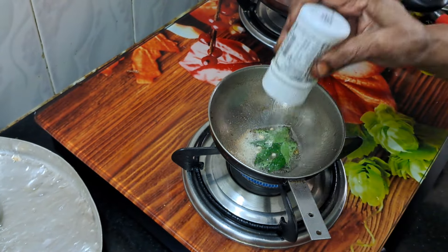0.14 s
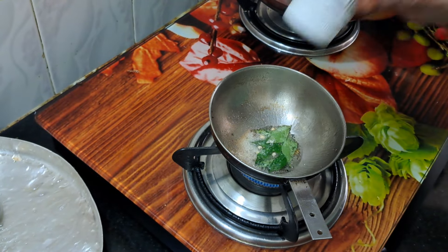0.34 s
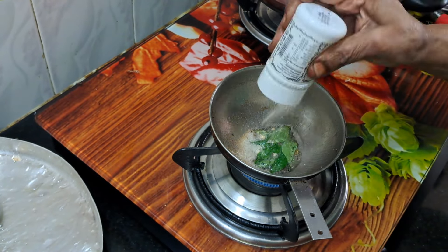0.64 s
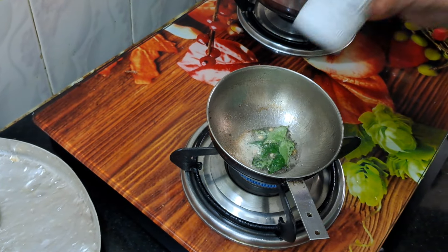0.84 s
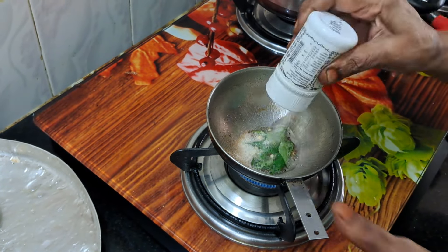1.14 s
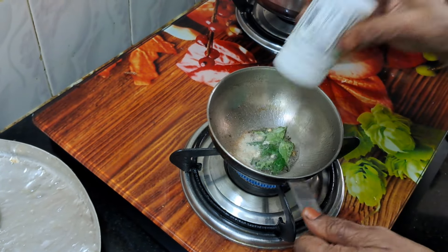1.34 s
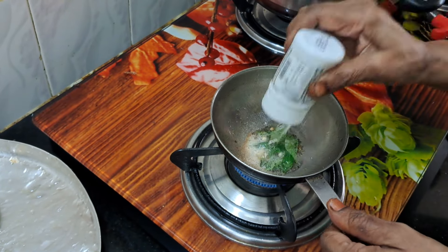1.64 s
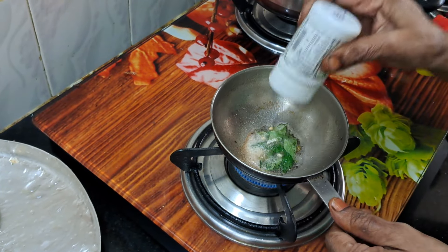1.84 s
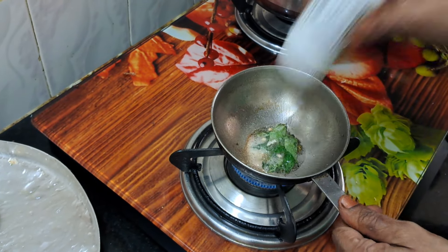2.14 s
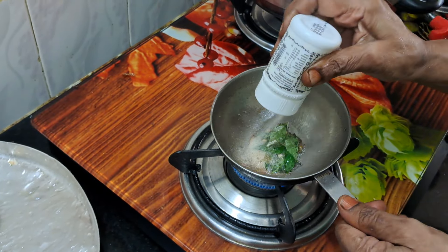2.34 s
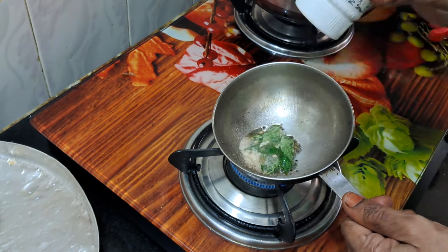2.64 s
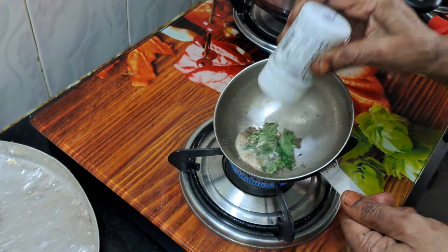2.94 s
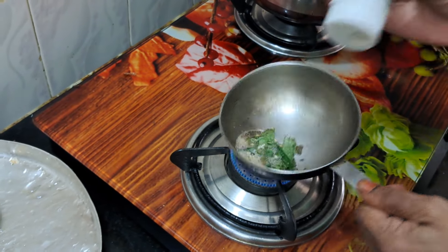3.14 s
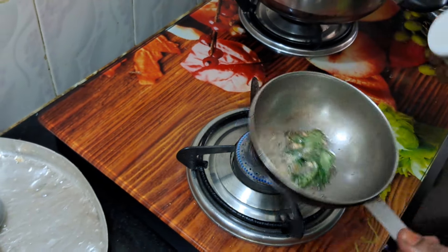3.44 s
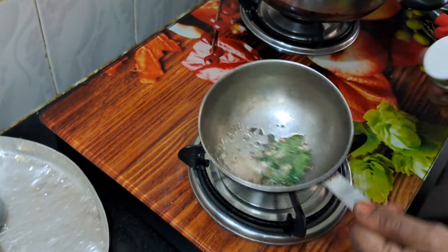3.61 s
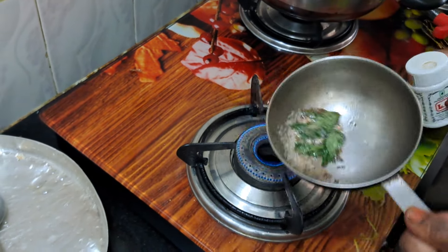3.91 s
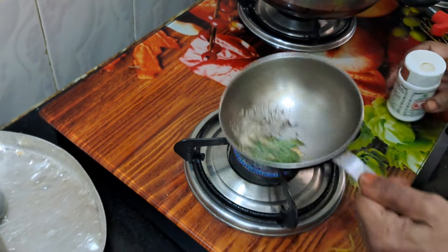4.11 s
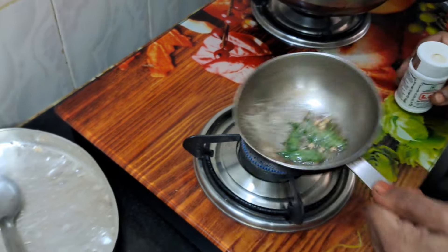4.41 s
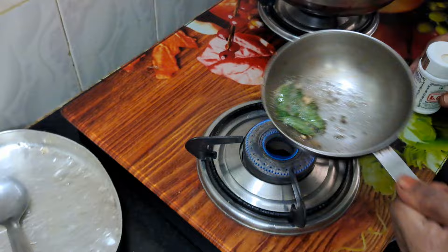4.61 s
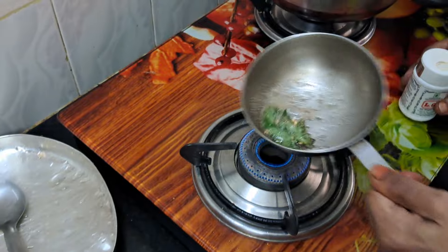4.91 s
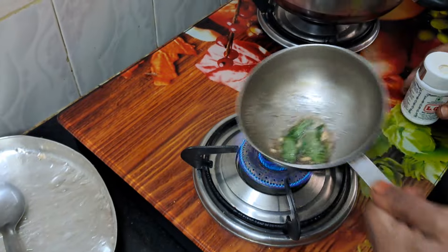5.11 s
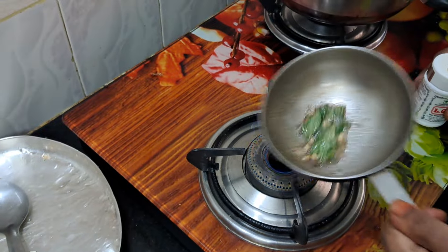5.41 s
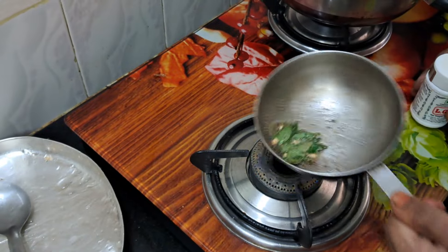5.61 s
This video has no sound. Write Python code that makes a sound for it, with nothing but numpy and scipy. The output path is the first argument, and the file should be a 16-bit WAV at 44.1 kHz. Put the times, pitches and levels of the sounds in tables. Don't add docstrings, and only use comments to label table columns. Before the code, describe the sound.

Sharp irregular pops and fine sizzling from a small frying pan, hollow stove knocks as it shifts, faint high tinkles, distant engine throbbing.

```python
import sys
import numpy as np
from scipy import signal
from scipy.fft import rfft, irfft
from scipy.io import wavfile
from scipy.ndimage import uniform_filter1d

SR = 44100
rng = np.random.default_rng(int(sys.argv[2]) if len(sys.argv) > 2 else 0)


def log_audio(samples):
    frames = np.atleast_2d(samples).T
    limited = np.clip(frames, -1, 1)
    pcm = np.round(limited * 32767).astype(np.int16)
    wavfile.write(sys.argv[1], SR, pcm)


def field_ratio(decibels):
    return 10 ** (np.asarray(decibels, dtype=float) / 20)


N = 254104
TIME = np.arange(N) / SR


def level(x, db):
    return x * field_ratio(db) / np.sqrt(np.mean(x ** 2))


def ring(x, hz, width):
    return signal.lfilter(*signal.iirpeak(hz, hz / width, fs=SR), x)


def colour(x, points):
    hz, db = np.transpose(points)
    f = np.maximum(np.fft.rfftfreq(x.shape[-1], 1 / SR), 1)
    return irfft(rfft(x) * field_ratio(np.interp(np.log(f), np.log(hz), db)), x.shape[-1])


def walk(rate):
    k = int(SR / rate)
    held = np.repeat(rng.standard_normal(N // k + 1), k)
    return 1.39 * uniform_filter1d(uniform_filter1d(held, k), k)[:N]


def pair(x, pan_db):
    return x * field_ratio(np.array([[.5], [-.5]]) * pan_db)


def add(out, s, sound):
    i = int(s * SR)
    out[:, i:i + sound.shape[1]] += sound[:, :N - i]


BAND_HZ = 250 * 2 ** np.arange(0, 6.3, .25)
# (t/s, level/dB, brightness per part/dB, left minus right/dB, extra body/dB)
POPS = [(0.076, -37, 1.5, 1, -7), (0.17, -26, 0.5, -2, 1), (0.2367, -32, -4.5, 5.5, 1),
        (0.2602, -16.5, 0.5, -4.5, -2), (0.317, -24.5, -2.5, 4, -3), (0.6952, -13.5, 3.5, 0, 1),
        (0.9712, -23, 5, 3, 1), (1.4476, -31, 9, -4.5, 7), (1.511, -26, -4.5, -6.5, -10),
        (1.659, -35.5, 0.5, 4, 5.5), (1.699, -31, -1, -7.5, 7.5), (1.7213, -37, 2.5, 10, 6),
        (1.9493, -38.5, 0.5, -0.5, 3), (2.142, -42, 6.5, 1.5, 6.5), (2.6918, -35.5, 0.5, 2, 6),
        (2.817, -33.5, 5.5, 5, -6), (3.1623, -34.5, 1, 1, 0), (3.632, -37, 9, -2.5, 3),
        (3.6646, -32, 6.5, -3, 3), (3.7315, -18, 4.5, 1, 1.5), (4.0958, -41, 10, -1, 11),
        (4.3647, -35.5, 5, -10, -2), (4.3978, -36.5, 2.5, -0.5, 7.5), (4.4783, -28, -3.5, 4, -0.5),
        (4.9786, -32, -5.5, -1.5, -8.5), (5.348, -38.5, 14, 0.5, -8), (5.3947, -24.5, 1.5, -3.5, -10),
        (5.473, -29, -8, -6.5, -4), (5.5372, -20, 3, 3, -0.5), (5.5799, -25, 2.5, 0.5, 5)]
BURST_PART = [0, 0, 0, 0, 0, 1, 1, 2, 2, 2]


def seeds():
    part = np.interp(np.log(BAND_HZ), np.log(np.transpose(BURST_SPECTRUM)[0]), BURST_PART)
    return [(s, level_db + tilt_db * (part - 1) + body_db * np.clip(1 - part, 0, 1), pan_db)
            for s, level_db, tilt_db, pan_db, body_db in POPS]


# (t/s, level/dB, centre f/Hz)
SPITS = [(0.047, -29, 4500), (0.59, -32.5, 5740), (0.31, -28.5, 5400), (1.1155, -38, 8700),
         (1.7, -28.5, 5100), (1.3694, -35.5, 6900), (1.8537, -32, 1650), (1.9126, -35.5, 5940),
         (2.0562, -33.5, 3000), (2.4, -33.5, 2800), (2.5346, -34.5, 3600), (2.5603, -36, 4000),
         (2.677, -31.5, 1400), (3.1, -32, 4000), (2.8735, -27, 4200), (2.95, -32, 2900),
         (3.054, -33.5, 7900), (1.9, -31.5, 2500), (3.3256, -30, 2140), (3.5653, -45, 3000),
         (3.913, -29.5, 6700), (5.447, -44, 1800), (3.2, -34, 1500), (4.202, -38, 3200),
         (3.337, -29.5, 1300), (2.903, -34, 1900), (2, -48, 1700), (0.017, -33.5, 3200), (.353, -32, 3500),
         (1.5985, -40.5, 2400), (0.066, -30.5, 4800), (0.0043, -32, 5100), (0.01, -37.5, 3300),
         (.214, -30, 2000), (0.6, -52, 5000), (0.5, -36.5, 1500), (1.1, -40, 1700), (8.2, -37, 2460),
         (.961, -36.5, 3000), (1.13, -48, 2500)]
# (t/s,
# level/dB)
TICKS = [(0.3356, -25), (0.4756, -30.5), (0.6196, -35), (1.598, -36.5), (1.826, -37), (2.325, -35),
         (2.4707, -34.5), (2.801, -29.5), (2.9821, -29), (3.1434, -31), (3.259, -29.5), (3.3557, -34.5),
         (3.496, -30.5), (3.6043, -32), (4.075, -29), (4.1448, -34), (4.1745, -32), (4.3039, -43),
         (4.721, -35), (4.7699, -33), (4.871, -51), (5.09, -37), (4.499, -31), (4.52, -32), (5.012, -34.5),
         (4.836, -39), (5.1326, -36), (5.3209, -41), (.2139, -32), (.4848, -33), (0.7065, -32),
         (0.7126, -21), (1.2407, -37), (1.3462, -46), (2.4453, -37), (2.9632, -37), (3.7408, -21),
         (3.7437, -22), (3.9943, -46), (4.9038, -41), (5.522, -42), (5.03, -32), (5.207, -39), (5.634, -36),
         (.117, -33), (.135, -44)]


def spits():
    drops = SPITS + [(s, level_db, 12000) for s, level_db in TICKS]
    sides = rng.standard_normal(len(drops))
    slope_db, scatter_db = 9.5, 3
    return [(s, level_db - slope_db * abs(np.log2(BAND_HZ / centre_hz)), scatter_db * side - 3.0)
            for (s, level_db, centre_hz), side in zip(drops, sides)]


def burst(chance, decay_s):
    crack = (chance[0] + 2.0 * chance[1:]) * np.exp(-TIME[:chance.shape[1]] / decay_s)
    crack[:, :2] += [4.5, -3.0]
    bins = rfft(crack, 512)
    crack = irfft(bins / abs(bins) ** .7)[:, :chance.shape[1]]
    return crack / np.sqrt(np.mean(np.sum(crack ** 2, axis=1)))


# (f/Hz, level/dB)
BURST_SPECTRUM = [(250, -2), (700, 1.5), (1150, 8), (1600, 7.5), (2600, 7), (3800, 4.5), (6300, 2),
                  (8000, 3), (13000, 2.5), (17000, -2.5)]


def pops():
    out = np.zeros((3, N))
    knee_hz, knee_db = np.transpose(BURST_SPECTRUM)
    common_db = np.interp(np.log(BAND_HZ), np.log(knee_hz), knee_db)
    rows = seeds() + spits()
    chance = rng.standard_normal((len(rows), 3, 256))
    for (s, part_db, pan_db), draw in zip(rows, chance):
        far = field_ratio(-.9 * abs(pan_db))
        crack = np.vstack([pair(burst(draw, decay_s=0.0011), pan_db), far * signal.unit_impulse(256)])
        points = np.transpose([BAND_HZ, 19.5 + common_db + part_db])
        add(out, s - .0005, colour(np.pad(crack, ((0, 0), (64, 192))), points))
    thump_db, thump_s = -11.5, 0.00053
    t = TIME[:512] / thump_s
    for s, level_db, *_ in POPS:
        add(out[:2], s + 0.0022, -field_ratio(level_db + thump_db) * np.e * (t * np.exp(-t))[None])
    return kitchen(out[:2], out[2], wet_db=2.0)


# (t/s, peak level/dB, left minus right/dB)
SNAPS = [
    (1.6992, -19, .5),
    (4.3655, -7.5, -9),
]


def snaps():
    out = np.zeros((2, N))
    for s, peak_db, pan_db in SNAPS:
        add(out, s, pair(field_ratio(peak_db) * np.array([.6, -1, .5, .2, -.3]), pan_db))
    return out


# (t/s, peak level/dB, f/Hz)
PINGS = [
    (0.319, -13.5, 2900),
    (.3185, -10, 5300),
    (1.2138, -23.5, 2600),
    (2.4722, -21, 6560),
    (4.342, -30, 1430),
    (4.399, -28, 1500),
    (4.479, -22, 4000),
    (4.519, -31, 3750),
    (5.396, -24.5, 1520),
    (5.475, -16.5, 1450),
]


def bubble_pings():
    out, t = np.zeros((1, N)), TIME[:SR // 50]
    for s, peak_db, hz in PINGS:
        add(out, s, field_ratio(peak_db - 60 * t * hz / 11)[None] * np.sin(2 * np.pi * hz * t * (1 + 15 * t)))
    return out


# (t/s, peak level/dB)
STRIKES = [
    (.2605, -36.5),
    (.6957, -34),
    (3.7315, -35),
    (4.479, -36.5),
    (5.5374, -33.5),
]
# (f/Hz, level/dB, t60/s)
STEEL = [(3544, -10, 0.08), (3750, -20, .2), (3900, -12.5, 0.16), (4130, -8, .1), (4304, -5, 0.14),
         (4470, -8, 0.11), (4725, -11.5, .2)]


def struck_steel():
    out, t = np.zeros((1, N)), TIME[:SR // 4]
    steel = 0
    for hz, db, t60 in STEEL:
        ragged_db = 5 * walk(250)[:len(t)]
        steel = steel + field_ratio(db - 60 * t / t60 + ragged_db) * np.sin(2 * np.pi * hz * t)
    for s, peak_db in STRIKES:
        add(out, s, field_ratio(peak_db) * steel[None])
    return out


# (t/s, fizz level/dB, dull share level/dB)
FRY = [(0.0, -45, -2.5), (0.26, -48, -19), (0.53, -49, -1), (0.94, -47, -6), (1.2, -50, -3),
       (2.29, -51.5, -8), (2.95, -49, -5), (3.48, -50, -3.5), (3.7, -47.5, -6.5), (4.17, -46.5, -5.5),
       (4.28, -44.5, -7), (5.37, -52, 0), (5.489, -48.5, 2), (5.76, -45, -1)]
# (f/Hz, level per Hz/dB)
FIZZ = [(450, -44), (750, -6.5), (1100, -7.5), (1800, -8.5), (2900, -5), (3600, -13), (4500, -7),
        (6700, -13), (8000, -6.5), (9500, -8.5), (12700, -3), (15600, -6.5), (16300, -41)]


def sizzle():
    s, fizz_db, dull_db = np.transpose(FRY)
    out = np.zeros((2, N))
    for hz in 1000 * 2 ** np.arange(0, 4.1, .5):
        when, size, side = rng.random((3, 3500))
        clicks = np.zeros((2, N))
        clicks[:, (when * N).astype(int)] = pair(field_ratio(-3.2 * np.log(size + 1.5e-3)), 12 * (side - .5))
        width = hz / 4.1
        hiss = level(ring(clicks, hz, width), 0) + level(ring(rng.standard_normal((2, N)), hz, width), 0.67)
        share = np.clip(np.log2(8000 / hz) / 2, 0, 1)
        patch_db = 2 * walk(16)
        out += np.sqrt(hz) * hiss * field_ratio(patch_db + share * (np.interp(TIME, s, dull_db) + 1.5))
    flicker_db = 1.2 * walk(30)
    fizz = level(colour(out, FIZZ), 0.26) * field_ratio(np.interp(TIME, s, fizz_db) + flicker_db)
    return kitchen(fizz, fizz.mean(axis=0), wet_db=-4.0)


# (t/s, drone level/dB)
DRAGS = [
    [(1.428, -59), (1.622, -80), (1.9, -50.5)],
    [(2.18, -50), (2.4, -52), (2.738, -50.5), (3.084, -42), (3.42, -55.5)],
    [(5.34, -41.5), (5.576, -46.5), (5.76, -45.5)],
]
# (t/s, peak level/dB, hardness/dB, fade t60/s, depth/dB)
JOLTS = [(1.428, -32, 1, 0.081, 5), (1.44, -33.5, 3, 0.27, 7.5), (1.504, -39.5, 6, 0.14, -6),
         (1.534, -42, -10, 0.11, 6), (1.645, -31, 2.5, 0.11, -8), (1.662, -31, -6, 0.11, 4.5),
         (1.699, -34.5, 11, 0.19, 1), (1.727, -25, 6, 0.077, 2.5), (1.748, -38, 5, 0.07, -3),
         (2.185, -26.5, -1, 0.081, 0.5), (2.199, -27, -9, 0.081, 0), (2.352, -29.5, 0.5, 0.15, 0),
         (2.374, -34.5, 2, 0.17, 0), (2.449, -39, -2.5, 0.25, -2), (2.566, -34.5, -3, 0.074, 3),
         (2.62, -34, -33, 0.074, -1), (2.739, -24, 3, 0.073, 0.5), (2.757, -31.5, -2, 0.22, 2),
         (2.808, -25, -14.5, 0.078, 2.5), (2.93, -24.5, -10.5, 0.066, -0.5), (3.009, -42, -20, 0.11, 2),
         (3.1, -27, -9, 0.12, -3), (3.159, -37, -12, 0.11, -5), (3.198, -26.5, -4, 0.12, 0),
         (3.24, -36, 2.5, 0.058, 1), (3.3, -41, -23, 0.096, 7), (5.587, -21.5, -5, 0.046, -1),
         (5.604, -33, -2, 0.1, 7)]


def stand_forces():
    push = np.zeros((4, N))
    for table in DRAGS:
        s, drone_db = np.transpose(table)
        push += field_ratio(np.interp(TIME, s, drone_db, -120, -120) + np.array([[-6], [-6], [-7], [-14]]))
    t = TIME[:SR // 3]
    landing_s, landing_grit_db = 5.5, 16.5
    for s, peak_db, hardness_db, t60, depth_db in JOLTS:
        grit_db = -5.5 + 0.6 * hardness_db + landing_grit_db * (s > landing_s)
        shape = (1 - np.exp(-t / 0.012)) * field_ratio(-60 * t / t60)
        share_db = np.array([[depth_db - 4], [-3], [hardness_db], [grit_db]])
        add(push, s - .001, shape / shape.max() * field_ratio(peak_db - 11.0 + share_db))
    return push


def mode_bank(x, modes):
    return sum((-1) ** k * field_ratio(db) * ring(x, hz, width) / np.sqrt(width)
               for k, (hz, width, db) in enumerate(modes))


# (t/s, peak level/dB, f/Hz, t60/s)
JAR = (4.185, -33, 262, .14)


def jar():
    out, t = np.zeros((1, N)), TIME[:SR // 3]
    s, peak_db, hz, t60 = JAR
    add(out, s, field_ratio(peak_db - 60 * t / t60)[None] * np.sin(2 * np.pi * hz * t))
    return out[0]


# (f/Hz, width/Hz, level/dB)
STOVE_DEEP = [(248, 29, -9), (282, 15, -2), (346, 24, 0)]
STOVE_LOW = [(371.6, 22, -3), (426, 24, 2.5), (516, 45, -9)]
STOVE_UPPER = [(572, 34, -4), (625, 26, -1), (661, 22, 4.5), (754, 45, -5)]
# (f/Hz, width/Hz, level/dB)
GRIT = [(811, 92, 1), (961, 165, 2), (1207, 47, -4), (1470, 135, -0.5), (1684, 86, -6), (2230, 1300, -1)]


def drags():
    slips = rng.standard_normal(N) * field_ratio(2.0 * walk(150))
    knocks = (np.array(JOLTS)[:, 0] * SR).astype(int)
    slips[knocks[:, None] + np.arange(120, 145)] += 1.1
    sound = jar()
    for modes, force in zip((STOVE_DEEP, STOVE_LOW, STOVE_UPPER, GRIT), stand_forces()):
        sound = sound + mode_bank(slips * force, modes) / np.std(mode_bank(slips, modes))
    return kitchen(pair(sound, 2.1), sound, wet_db=-3.0)


# (t/s, peak level/dB, ring f/Hz, left minus right/dB)
TINKLES = [(3.6995, -38, 12540, -8), (3.83, -36, 12820, -7), (3.8787, -45, 12600, -7),
           (4.174, -19, 12790, -19), (4.195, -34, 12300, -8), (4.2193, -31, 12600, 3),
           (4.4433, -25, 12800, -14), (4.5462, -31, 12800, -19), (4.7691, -24, 12870, -20),
           (5.131, -25.5, 12340, -14), (5.136, -28, 13700, -14), (5.116, -34, 12340, -10),
           (5.318, -40, 12800, -8), (5.32, -41, 11440, -6), (1.2411, -40, 11300, 0),
           (4.52, -30, 12300, -10), (4.655, -36, 12900, -8), (4.67, -36, 12500, -8),
           (5.637, -33, 12800, -6), (5.447, -32, 12370, -15)]


def bangles():
    out, t = np.zeros((2, N)), TIME[:SR // 5]
    for s, peak_db, hz, pan_db in TINKLES:
        tone = np.sin(2 * np.pi * hz * t) + np.sin(2 * np.pi * (hz + 110) * t)
        tone += .6 * np.sin(2 * np.pi * (hz - 230) * t)
        fade_db = 7 * (1 - np.exp(-t / .009)) + 60 * t / .22 + 12 * np.exp(-t / .0015)
        add(out, s, pair(field_ratio(peak_db - 15 - fade_db) * tone, pan_db))
    out = out * field_ratio(4.5 * walk(150))
    return kitchen(out, out.mean(axis=0), wet_db=-15)


# (t/s, firing rate f/Hz, engine level/dB, exhaust boom level/dB)
BIKE = [(0.0, 27.67, -50.5, -64), (0.7, 28.18, -43, -76), (1.12, 27.53, -56, -52), (1.47, 30, -56, -59),
        (1.7, 31.76, -60, -51), (1.91, 33.36, -52, -52), (2.09, 32.9, -50.5, -54.5),
        (2.279, 29.2, -44, -51), (2.58, 25.27, -56, -40.5), (2.691, 25.26, -56, -73),
        (2.92, 24.78, -43.5, -57), (3.37, 23.53, -43.5, -63), (3.79, 24.37, -40.5, -70),
        (4.25, 26.08, -43, -46.5), (4.96, 27.93, -36.5, -41), (5.49, 27.46, -38.5, -43.5),
        (5.58, 28.73, -46, -54), (5.76, 30.4, -31, -46)]
# (multiple of firing rate, level/dB)
UPPER_ORDERS = [(4, -0.5), (5, 1.5), (6, -8.5), (7, -8.5), (8, -13), (9, -10)]
# (f/Hz, level/dB)
WALLS = [(48, -10), (54, 0), (65, -1), (75, 6), (83, -14), (98, 4)]
# (f/Hz, width/Hz, lift/dB)
ROOM_MODE = (156, 36, 7.4)


def motorbike(load_db):
    s, *columns = np.transpose(BIKE)
    hz, upper_db, boom_db = (np.interp(TIME, s, c) for c in columns)
    turn, lag = 2 * np.pi * np.cumsum(hz) / SR, np.array([[.15], [-.15]])
    mode_hz, mode_width, mode_db = ROOM_MODE

    def wall(f):
        return np.interp(f, *np.transpose(WALLS))

    def order(k):
        return np.sin(k * turn + 2 * np.pi * rng.random() + .45 * walk(4) + lag * walk(2))

    upper = 0
    for k, db in UPPER_ORDERS:
        lift_db = mode_db / (1 + ((k * hz - mode_hz) / mode_width) ** 2)
        load = load_db * (k != 5)
        upper = upper + field_ratio(db + load + lift_db + 1.7 * walk(2.57)) * order(k)
    second = field_ratio(boom_db + wall(2 * hz) + 2.0) * order(2)
    third = field_ratio(boom_db + wall(3 * hz) + 1.0) * order(3)
    return second + third + level(upper, -1.8) * field_ratio(upper_db)


# (f/Hz, level per Hz/dB)
STREET = [(18, -44), (30, -10), (140, -8), (255, -12.5), (353, -11.5), (437, -18.5), (561, -16), (981, -28),
          (1100, -20), (1360, -28.5), (1500, -25), (1930, -34.5), (3000, -41), (3900, -46), (6600, -120)]


def rumble(noise_db):
    mid, side = colour(rng.standard_normal((2, N)), STREET)
    side = signal.lfilter(*signal.butter(1, 600, "high", fs=SR), side) + 0.12 * side
    return level(mid + side * np.array([[1], [-1]]), 10.6) * field_ratio(noise_db + walk(6))


# (f/Hz, width/Hz, level/dB)
HUM = (144, 3, -52.5)


def room_hum(hum_db):
    hz, width, db = HUM
    return level(ring(rng.standard_normal(N), hz, width), db) * field_ratio(hum_db)


# (t/s, engine load/dB, traffic level/dB, room resonance level/dB)
TRAFFIC = [(0, -8, -64, -5), (.7, 0, -63, 2), (1.3, -2, -65.5, 2.5), (1.9, -3.5, -61.5, -3),
           (2.3, 6, -59.5, -6.5), (2.9, -6, -60, 3), (3.5, 1.5, -58.5, 5.5), (3.9, 2, -57.5, 3),
           (4.4, 0.5, -56, 0.5), (4.9, 2, -53.5, 1), (5.3, 1.5, -55, -4), (5.76, -1, -52.5, 3)]


def street():
    s, *columns = np.transpose(TRAFFIC)
    load_db, noise_db, hum_db = (np.interp(TIME, s, c) for c in columns)
    return pair(motorbike(load_db) + room_hum(hum_db), 0.59) + rumble(noise_db)


# (f/Hz, t60/s)
KITCHEN_T60 = [(150, 0.51), (500, 0.34), (1300, 0.34), (3500, 0.32), (9000, 0.28), (15000, 0.35)]
# (delay t/s, left level/dB, right level/dB)
ECHOES = [(.0122, -19, -27), (.0172, -28, -18)]


def kitchen(near, feed, wet_db):
    t = TIME[:SR // 2]
    tail, (knee_hz, knee_t60) = np.zeros((2, len(t))), np.transpose(KITCHEN_T60)
    for hz in 60 * 2 ** np.arange(0, 8.5, .5):
        edges = signal.butter(2, [hz, min(hz * np.sqrt(2), .49 * SR)], "band", fs=SR, output="sos")
        t60 = np.interp(np.log(hz), np.log(knee_hz), knee_t60)
        mid, side = signal.sosfilt(edges, rng.standard_normal((2, len(t)))) * field_ratio(-60 * t / t60)
        tail += mid + min(hz / 600, 1.2) * side * np.array([[1], [-1]])
    tail *= field_ratio(wet_db) * (1 - np.exp(-t / 0.0031)) / np.sqrt(np.sum(tail ** 2) / 2)
    for delay, left_db, right_db in ECHOES:
        tail[:, int(delay * SR)] += field_ratio(np.array([left_db, right_db]) + wet_db)
    return near + signal.fftconvolve(feed[None], tail, axes=1)[:, :N]


def scene():
    ringing = bubble_pings() + struck_steel()
    frying = pops() + snaps() + kitchen(pair(ringing, -.6), ringing[0], wet_db=-1.0) + sizzle()
    return frying + drags() + bangles() + street()


def roll_off(x):
    return signal.sosfilt(signal.butter(12, 16480, fs=SR, output="sos"), x)


def record(dry):
    x = signal.sosfilt(signal.butter(4, 48, "high", fs=SR, output="sos"), dry)
    x = signal.sosfilt(signal.ellip(8, .3, 40, 15750, fs=SR, output="sos"), x)
    mix = np.clip(x, -1, 1)
    return roll_off(mix)


dry = scene()
out = record(dry)
log_audio(out)
```